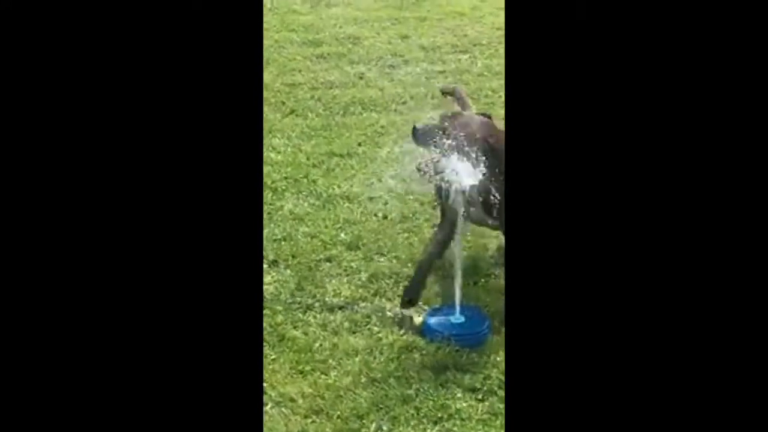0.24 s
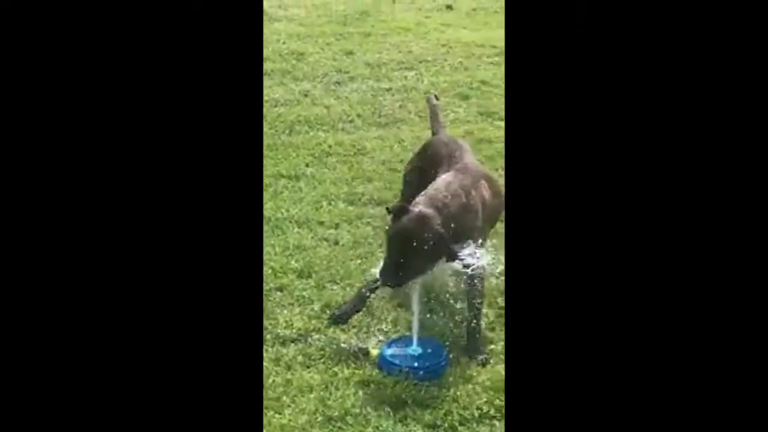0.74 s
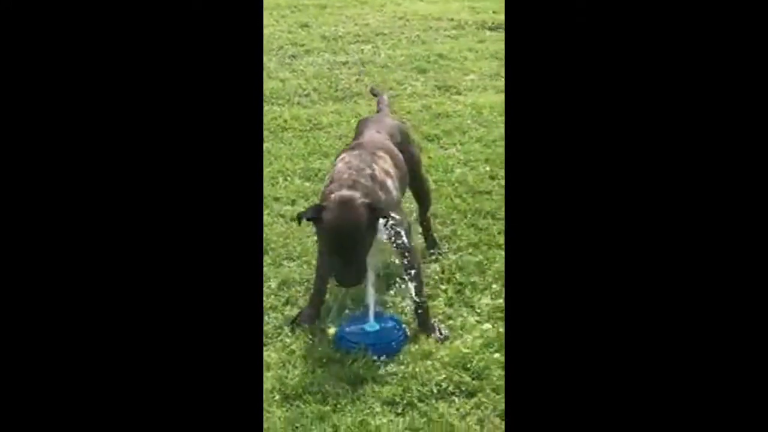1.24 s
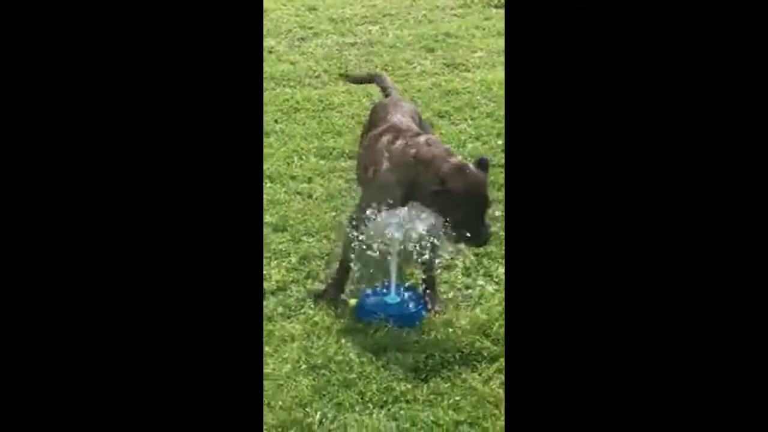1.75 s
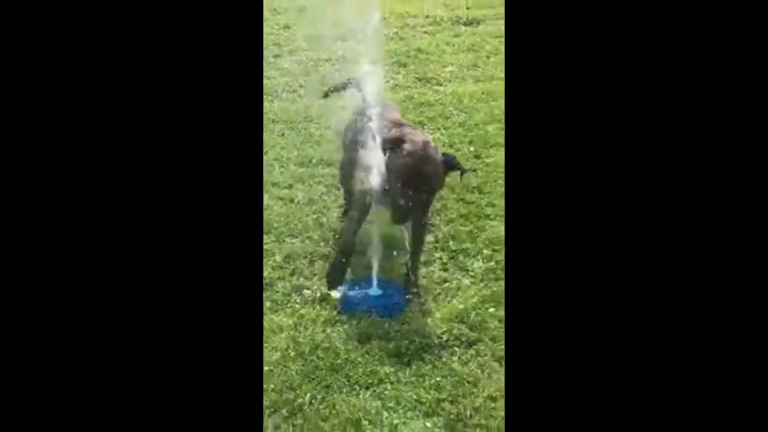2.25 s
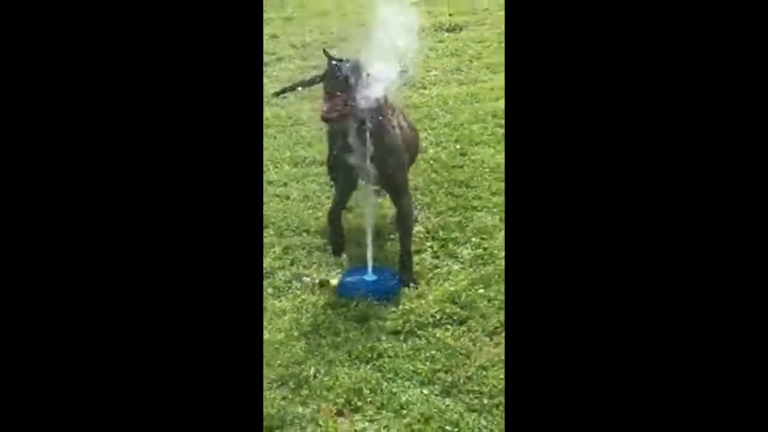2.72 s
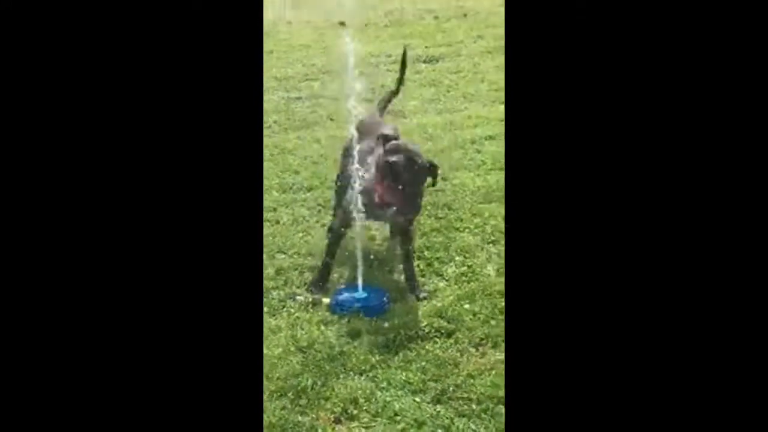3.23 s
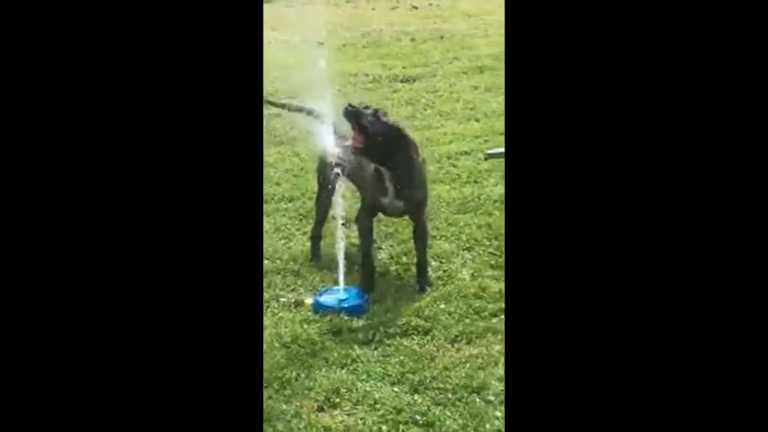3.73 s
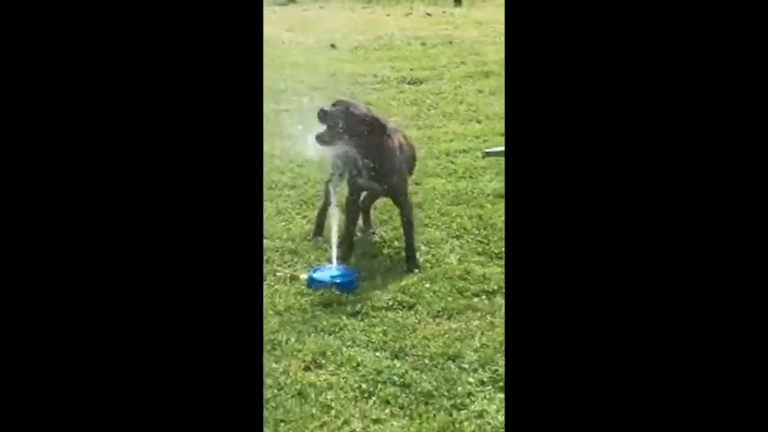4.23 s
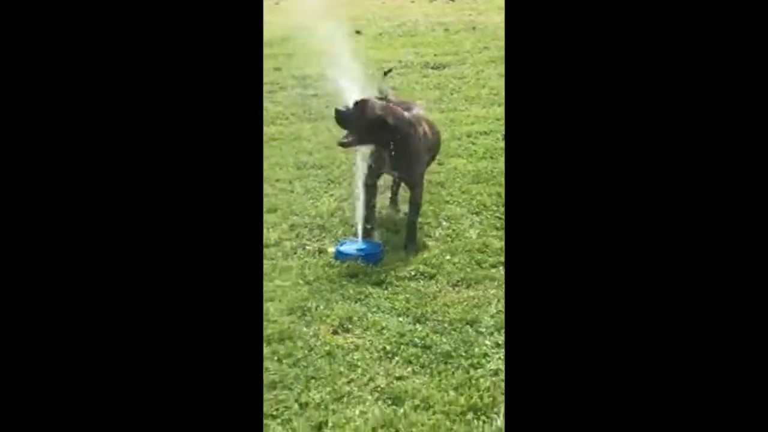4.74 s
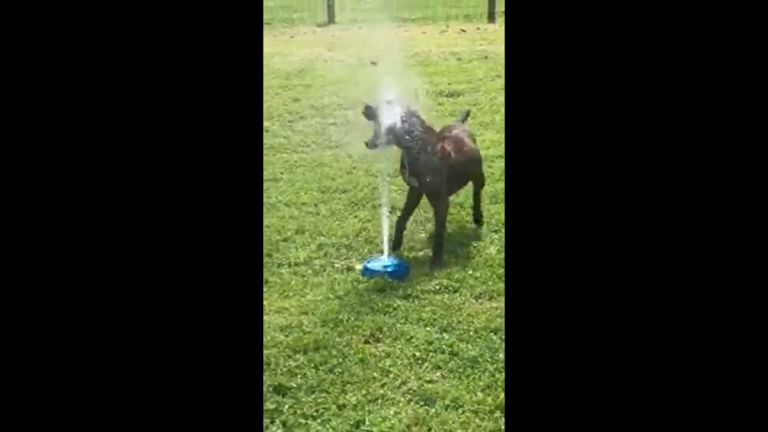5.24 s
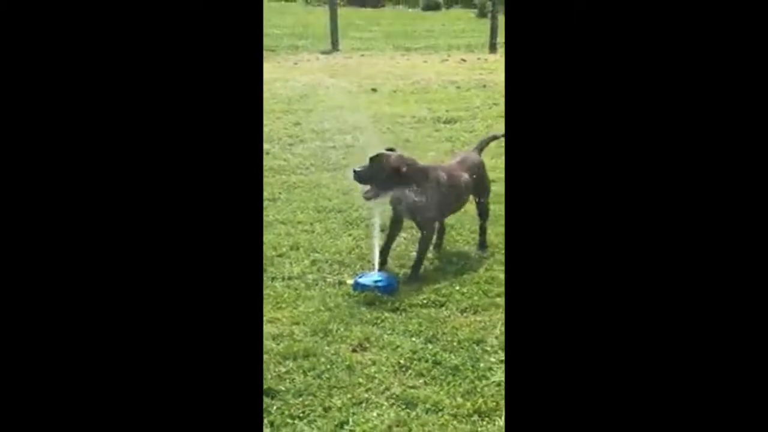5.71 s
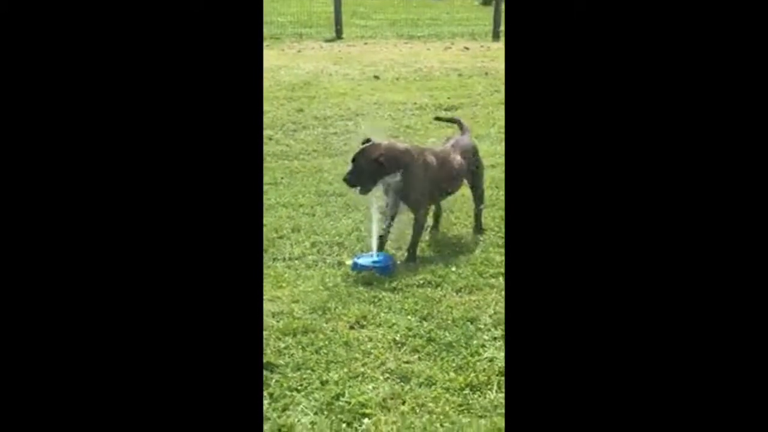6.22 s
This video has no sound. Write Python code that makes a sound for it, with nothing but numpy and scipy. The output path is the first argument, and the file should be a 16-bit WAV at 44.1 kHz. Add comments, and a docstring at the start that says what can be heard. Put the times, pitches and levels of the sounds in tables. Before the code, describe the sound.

A water jet hisses and splashes unevenly against a dog's coat and open mouth on a lawn, while wind thumps the microphone.

```python
"""A sprinkler toy shoots a jet of water up from a lawn while a dog snaps at it.
The jet is coloured drop noise: it hisses, splashes on the coat and rings through resonances in the open mouth.
A reflection off the wet ground sweeps a comb through the hiss as the point of impact rises and sinks.
Teeth click as short decaying tones; gusts of coloured noise and pressure drops buffet the microphone
over outdoor air and a low, slightly wavering hum."""
import sys
import numpy as np
from scipy import signal
from scipy.fft import rfft, irfft, next_fast_len
from scipy.io import wavfile
from scipy.ndimage import uniform_filter1d, map_coordinates

SR = 44100
rng = np.random.default_rng(int(sys.argv[2]) if len(sys.argv) > 2 else 0)


def to_wav(sig):
    """Store sig (one row per channel, or 1-D mono) as 16-bit WAV at the path in sys.argv[1].

    Samples outside -1..1 are clipped; the rate is SR.
    """
    pcm = np.clip(np.atleast_2d(sig), -1, 1) * 32767
    pcm = np.round(pcm).astype(np.int16)
    wavfile.write(sys.argv[1], SR, pcm.T)  # frames by channels


N = 285313  # length in samples

# Hiss of the jet, loud while the dog stands in it, faint while it rises freely.
# Each row: time in seconds, fine mist in dB, spray in dB, both before the layer trims.
JET_LEVELS = [(0, -46.5, -50), (.23, -49, -53.5), (.32, -45, -43), (.62, -40.5, -39.5), (.85, -41.5, -44),
              (1.25, -46, -52), (1.7, -48, -52), (2.06, -41, -42), (2.48, -43.5, -47.5), (2.7, -51, -54),
              (2.82, -47, -47), (3.08, -42, -43), (3.3, -45.5, -48), (3.44, -56.5, -56), (3.8, -54.5, -60),
              (3.91, -42, -45), (4.3, -41.5, -42), (4.7, -45, -48), (4.99, -50, -53), (5.08, -43.5, -42.5),
              (5.2, -44, -46), (5.55, -41.5, -45.5), (6.13, -45, -48.5), (6.47, -51, -54.5)]
# The full jet slaps onto the coat. Each row: start in seconds, hold in seconds, level in dB before the lumps.
COAT_SPLASHES = [(.06, 0.083, -47), (.38, .15, -45.5), (.64, 0.11, -42.5), (.87, 0.18, -49),
                 (1.07, 0.2, -45), (1.34, 0.26, -49.5), (1.85, .24, -42.5), (2.17, 0.1, -44.5),
                 (2.8, 0.16, -52), (3.13, 0.17, -44), (4.37, 0.052, -43.5), (4.52, 0.23, -45.5),
                 (5.09, 0.22, -51), (5.65, 0.053, -48.5), (6.22, 0.045, -48.5)]
SPLASH_ATTACK_S, SPLASH_RELEASE_S = 0.041, 0.056


def water():
    """Mist, spray and splash flutter together as lumps of the jet land; stray fat drops tick."""
    mist_db, spray_db = in_time(JET_LEVELS)
    spray_swing_db = spray_db - spray_db.mean()
    slaps = surges(COAT_SPLASHES, SPLASH_ATTACK_S, SPLASH_RELEASE_S)
    landing = slugs(per_s=160, fade_s=0.012)
    jet = mist(mist_db, landing) + spray(spray_db, slaps, landing)
    return jet + splash(spray_swing_db, slaps, landing) + stray_drops(spray_swing_db)


# Spectrum of the fine mist. Each row: frequency in Hz, relative density in dB per Hz.
MIST_SPECTRUM = [(4000, -26.5), (7000, -3.5), (7700, -1.5), (8350, 2.5), (8750, 1), (9400, 0.5),
                 (10200, -2.5), (11700, 1.5), (13500, -1), (16000, -5)]
MIST_TRIM_DB = 1.27


def mist(level_db, landing):
    """The densest, finest drops; they flutter with the landing lumps and partly on their own."""
    hiss = colour(drops(per_s=12000, spread_db=3.0, mist=1.0), MIST_SPECTRUM)
    hiss = off_ground(hiss, grass_hz=7500, tremble_ms=0.025)
    own_flutter = slugs(per_s=250, fade_s=0.015)
    return hiss * from_db(level_db + MIST_TRIM_DB + 0.59 * landing + 1.54 * own_flutter)


# Spectrum of the spray. Each row: frequency in Hz, relative density in dB per Hz.
SPRAY_SPECTRUM = [(700, -13), (2000, -13.5), (4000, -4.5), (4600, -1), (4950, -5), (5350, 0), (5650, -1),
                  (6800, 1.5), (7250, 1), (7700, -13), (9000, -22), (15000, -20)]
SPRAY_TRIM_DB = -1.16
SPLASH_SPRAY_DB = -11.5  # extra spray thrown by a splash, against the splash


def spray(level_db, slaps, landing):
    """Coarser drops sizzle, with more thrown off by each splash."""
    sizzle = colour(drops(per_s=7000, spread_db=3.5, mist=0.65), SPRAY_SPECTRUM)
    sizzle = off_ground(sizzle, grass_hz=8500, tremble_ms=0.025)
    level = np.hypot(from_db(level_db + SPRAY_TRIM_DB), from_db(SPLASH_SPRAY_DB) * slaps)
    return sizzle * level * from_db(1.1 * landing + 1.1 * drift(45))


# Spectrum of the splash. Each row: frequency in Hz, relative density in dB per Hz.
SPLASH_SPECTRUM = [(300, -16), (700, -6.5), (1200, -1.5), (1900, 3), (2600, 8), (3200, 8), (4200, 6.5),
                   (5000, 2.5), (6500, -4), (9000, -10), (15000, -21)]
# light patter that goes with the spray: level in dB at the mean spray level, share of the spray's swing
PATTER_DB, PATTER_FOLLOWS = -53, 0.32


def splash(spray_swing_db, slaps, landing):
    """Sparser, heavier impacts slap the coat over a light patter that follows the spray."""
    slap = colour(drops(per_s=2500, spread_db=3.0, mist=0.72), SPLASH_SPECTRUM)
    slap = off_ground(slap, grass_hz=6000, tremble_ms=0.035)
    patter = from_db(PATTER_DB + PATTER_FOLLOWS * spray_swing_db)
    return slap * np.hypot(patter, slaps) * from_db(0.06 + 1.96 * landing)


STRAY_DB, STRAY_FOLLOWS = -58, 0.69  # level at the mean spray level; share of the spray's swing


def stray_drops(spray_swing_db):
    """Single fat drops tick at random moments."""
    ticks = drops(per_s=30, spread_db=3.5, mist=0)
    ticks = colour(ticks, [(500, -6), (2000, 7.5), (4000, -7.0), (8000, 12), (16000, -13)])
    return ticks * from_db(STRAY_DB + STRAY_FOLLOWS * spray_swing_db)


# Ground reflection, later the higher the jet is caught and clearer the tighter its impact.
# Each row: time in seconds, lag in ms before the tremble, share from 0 to 1.
GROUND_REFLECTION = [(0, 1.2, .4), (.5, 1.42, .35), (.68, 1.33, .6), (.82, 1.08, .3), (1.2, .72, .4),
                     (1.8, .92, .45), (2.28, .95, .5), (2.5, 1.45, .15), (3.25, 1.28, .3), (4.0, 1.35, .4),
                     (4.6, 1.14, .75), (4.85, .92, .35), (5.3, 1.25, .3), (5.85, .83, .55),
                     (6.47, .71, .65)]


def off_ground(x, grass_hz, tremble_ms):
    """Direct sound plus a reflection dulled by grass; the trembling point of impact blurs the comb."""
    lag_ms, share = in_time(GROUND_REFLECTION)
    lag_ms = lag_ms + tremble_ms * drift(17)
    dull = signal.sosfiltfilt(signal.butter(1, grass_hz, fs=SR, output="sos"), x)
    reflection = map_coordinates(dull, [np.arange(N) - lag_ms * SR / 1000], order=3)
    return rms_one(x + share * reflection)


# The jet enters the open mouth. Each row: start in seconds, hold in seconds, level in dB, throat in Hz,
# throat glide in Hz per second, jaw cavity in Hz, jaw cavity in dB against the throat.
MOUTH_BITES = [(0.0, 0.057, -40.5, 1070, -200, 1780, -0.5), (0.45, 0.06, -44.5, 580, 295, 1220, 1),
               (0.876, 0.037, -42.5, 1100, -1200, 1730, -12), (1.075, .22, -50, 1150, -100, 1720, 2),
               (1.362, .17, -42.5, 1075, -300, 1800, -0.5), (1.63, 0.15, -45, 1050, 198, 1720, -3),
               (4.213, 0.063, -38.5, 676, 2000, 1380, 2)]
# Water slapping around lips and tongue. Each row: frequency in Hz, relative density in dB per Hz.
SLOSH_SPECTRUM = [(400, -13), (850, 6), (1400, 6), (2200, 9.5), (3000, 7), (3800, 0), (8000, -54)]
# The palate's fixed mode: frequency in Hz, width in Hz of each pass, level in dB against the jaw cavity.
PALATE_MODE = (2560, 410, -3)
THROAT_WIDTH_HZ, JAW_WIDTH_HZ = 230, 420  # of each of the two passes
BITE_ATTACK_S, BITE_RELEASE_S = 0.052, 0.072


def mouth():
    """Churning water rings a gliding throat, a jaw cavity and a palate, and slaps around the lips."""
    churn, out = drops(per_s=2500, spread_db=4.0, mist=0.99), np.zeros(N)
    slosh = colour(drops(per_s=1200, spread_db=1.0, mist=0.8), SLOSH_SPECTRUM)
    palate_hz, palate_width_hz, palate_db = PALATE_MODE
    for start, hold, db, throat_hz, glide, jaw_hz, jaw_db in MOUTH_BITES:
        flow = swell(start, hold, BITE_ATTACK_S, BITE_RELEASE_S)
        wet = flow > 0
        x, t = churn[wet], seconds()[wet] - start
        throat = cavity(x, throat_hz + glide * t, THROAT_WIDTH_HZ)
        jaw = cavity(x, np.full(len(x), jaw_hz), JAW_WIDTH_HZ)
        palate = cavity(x, np.full(len(x), palate_hz), palate_width_hz)
        front = jaw + from_db(palate_db) * palate + from_db(4.0) * slosh[wet]
        # the front of the mouth sounds in opposite phase to the throat
        hollow = throat - from_db(jaw_db) * front
        out[wet] += evened(hollow, span_s=0.13) * from_db(db) * flow[wet]
    return out


# The jaws snapping shut. Each row: time in seconds, level in dB of a 0 dB tooth.
JAW_SNAPS = [(3.6369, -32.5), (3.6404, -38), (3.6535, -41)]
# Ringing of the teeth. Each row: frequency in Hz, level in dB, time in seconds to fall by 60 dB.
TOOTH_MODES = [(1700, -28, .012), (2530, -8, 0.02), (3100, 0, 0.011), (3350, -1, 0.02), (4300, -2, .012),
               (5200, -5, .01), (5750, -3, 0.01), (7450, 0, 0.0043)]


def jaws():
    """Teeth meet with a dry tick and touch again: each contact starts a set of decaying tones."""
    clicks, t = np.zeros(N), seconds()[:SR // 10]
    for start, db in JAW_SNAPS:
        clicks[round(start * SR)] = from_db(db)
    ring = sum(from_db(db - 60 * t / t60) * np.sin(2 * np.pi * hz * t) for hz, db, t60 in TOOTH_MODES)
    return signal.fftconvolve(clicks, ring)[:N]


# The jet catches in a fold of lip or coat and the pocket rings briefly. Each row: centre in seconds,
# level in dB, half length in seconds, frequency in Hz, width in Hz of each pass.
RINGING_POCKETS = [(0.54, -45.5, 0.077, 1330, 260), (0.684, -42, 0.12, 3270, 600),
                   (1.234, -45, 0.059, 3030, 450), (1.371, -40.5, 0.082, 2440, 1100),
                   (2.025, -47.5, 0.22, 2480, 400), (2.03, -50, 0.12, 3230, 350),
                   (3.275, -43, 0.05, 3070, 500), (4.572, -51.5, 0.17, 1790, 380),
                   (4.622, -54.5, 0.22, 3500, 450), (6.257, -54, 0.16, 2800, 500)]


def pockets():
    """Drops drumming into a small hollow make a short, pitched swish."""
    rain, out = drops(per_s=1300, spread_db=3.5, mist=0.29), np.zeros(N)
    for centre, db, half_s, hz, width_hz in RINGING_POCKETS:
        a = max(int((centre - half_s) * SR), 0)
        b = min(int((centre + half_s) * SR), N)
        ring = cavity(rain[a:b], np.full(b - a, hz), width_hz)
        out[a:b] += from_db(db) * ring * np.hanning(b - a)
    return out


# The free jet falls back onto the grass: start in seconds, hold in seconds, level in dB.
GRASS_FALLBACK = (3.66, 0.46, -54.5)
# Spectrum of water on grass. Each row: frequency in Hz, relative density in dB per Hz.
GRASS_SPECTRUM = [(150, -11), (330, 4.5), (600, -5), (1200, -10.5), (3000, -16)]


def fallback():
    """Water that missed the dog comes down on the lawn in a soft, dull patter."""
    start, hold, db = GRASS_FALLBACK
    patter = colour(drops(per_s=400, spread_db=4.0, mist=0.63), GRASS_SPECTRUM)
    return from_db(db) * swell(start, hold, attack_s=0.12, release_s=0.13) * patter


# Breeze on the microphone between the gusts. Each row: time in seconds, level in dB before trim and lumps.
BREEZE_LEVELS = [(0, -42.5), (.6, -35), (.8, -48), (1.1, -32), (2.2, -39), (3.1, -33), (3.45, -51),
                 (4.1, -50), (4.6, -40), (4.9, -59.5), (5.3, -56), (5.7, -42.5), (6.47, -36)]
# Gusts. Each row: start in seconds, hold in seconds, then body, slow rumble and bright flutter,
# each in dB before its layer trim.
GUST_EVENTS = [(0.254, 0.088, -27.5, -27, -50), (.42, 0.092, -31, -31.5, -53),
               (.96, 0.055, -28.5, -40, -59), (1.059, 0.077, -22.5, -37, -47),
               (1.189, .075, -22.5, -27, -44), (1.336, 0.096, -24.5, -37, -41),
               (1.629, .045, -28.5, -33, -50), (1.704, .08, -24.5, -29, -43), (1.797, 0.032, -21, -21, -43),
               (1.875, 0.06, -28.5, -30, -53), (2.003, 0.077, -21, -34, -45),
               (2.328, 0.13, -37.5, -29.5, -59), (2.633, 0.054, -26, -27, -46),
               (2.747, .1, -24.5, -32, -50), (2.9, 0.043, -24, -24.5, -53), (3.027, .125, -30, -36, -54),
               (4.492, 0.1, -30, -34, -62.5), (4.703, 0.033, -31, -41, -68), (5.862, 0.041, -30, -24, -51),
               (5.927, 0.057, -31.5, -41, -53), (6.074, 0.067, -27, -26, -42.5),
               (6.21, .07, -29.5, -33, -41), (6.285, 0.23, -24.5, -28.5, -36.5)]
GUST_ATTACK_S, GUST_RELEASE_S = 0.021, 0.023


def wind():
    """Large eddies rumble under the breeze; each gust adds rumble, smaller eddies and a brighter flutter."""
    breeze_db, = in_time(BREEZE_LEVELS)
    starts, holds, *levels = np.transpose(GUST_EVENTS)
    pushes, heaves, tears = [
        surges(zip(starts, holds, db), GUST_ATTACK_S, GUST_RELEASE_S) for db in levels]
    return gust_body(breeze_db, pushes) + rumble(breeze_db, heaves) + flutter(tears)


# Spectrum of the smaller eddies. Each row: frequency in Hz, relative density in dB per Hz.
GUST_SPECTRUM = [(40, -12), (80, 5.5), (120, 8), (190, 1.5), (260, -10), (400, -24), (700, -49.5),
                 (1500, -44)]
BREEZE_TRIM_DB, GUST_TRIM_DB = -2.5, -2
BREEZE_LUMPS_DB = 2.5  # depth of the random lumps in the breeze


def gust_body(breeze_db, pushes):
    """Smaller eddies buffet the microphone, in a lumpy breeze and in the gusts."""
    eddies = evened(colour(rng.standard_normal(N), GUST_SPECTRUM), span_s=0.032)
    breeze = from_db(breeze_db + BREEZE_TRIM_DB + BREEZE_LUMPS_DB * drift(9.2))
    return eddies * np.hypot(breeze, from_db(GUST_TRIM_DB) * pushes)


# Spectrum of the slow rumble. Each row: frequency in Hz, relative density in dB per Hz.
RUMBLE_SPECTRUM = [(15, -20), (25, -31), (35, -3.5), (50, -4), (75, -0.5), (110, -6.5), (200, -45.5),
                   (500, -61)]
# rumble at the mean breeze level, its share of the breeze's swing, trim of the gusts' rumble
BREEZE_RUMBLE_DB, RUMBLE_FOLLOWS, GUST_RUMBLE_TRIM_DB = -39.5, 0.43, -2.5


def rumble(breeze_db, heaves):
    """Large eddies roll slowly with the breeze and heave with the gusts."""
    eddies = evened(colour(rng.standard_normal(N), RUMBLE_SPECTRUM), span_s=0.05)
    roll = from_db(BREEZE_RUMBLE_DB + RUMBLE_FOLLOWS * (breeze_db - breeze_db.mean()))
    return eddies * np.hypot(roll, from_db(GUST_RUMBLE_TRIM_DB) * heaves)


# Air tearing at the port. Each row: frequency in Hz, relative density in dB per Hz.
FLUTTER_SPECTRUM = [(100, -20.5), (230, 4), (350, -0.5), (500, -12.5), (700, -18), (1000, -37), (3000, -48)]
FLUTTER_TRIM_DB = 2.5


def flutter(tears):
    """Air tears at the microphone port in irregular bursts."""
    bursts = colour(drops(per_s=170, spread_db=5.5, mist=0.76), FLUTTER_SPECTRUM)
    return bursts * from_db(FLUTTER_TRIM_DB) * tears


# Single strong eddies thump on the microphone port. Each row: centre in seconds,
# depth in dB before the port's gain and high-pass, half width in ms.
PORT_EDDIES = [(1.807, -13.5, 1.5), (2.068, -14.5, 1.8), (2.762, -10.5, 2.4), (2.782, -19.5, 0.96),
               (2.816, -14, 1.55), (3.033, -23.5, 1.16), (3.147, -20.5, 0.57), (4.505, -25.5, 1.9),
               (4.828, -14, 5.3), (5.883, -18, 1.4), (6.135, -23.5, 1.1), (6.247, -23, 1.5),
               (6.305, -15.5, 0.97), (6.362, -18.5, 0.71)]
# Turbulence around each eddy. Each row: frequency in Hz, relative density in dB per Hz.
WAKE_SPECTRUM = [(100, -23.5), (220, 6), (350, -4), (500, -12), (700, -15.5), (1000, -28), (3000, -69)]
# fading time of the wake's power on either side; its level against an eddy of 1 ms half width
WAKE_S, WAKE_DB = 0.007, -21


def buffets():
    """A passing vortex makes a bell-shaped drop in pressure and a turbulent wake; tight ones drag the most."""
    t = seconds()
    suction, stirred_power = np.zeros(N), np.zeros(N)
    for centre, db, half_ms in PORT_EDDIES:
        suction += from_db(db) / (1 + ((t - centre) * 1000 / half_ms) ** 2)
        fade = np.exp(-np.minimum(np.abs(t - centre) / WAKE_S, 50))
        stirred_power += from_db(2 * db) / half_ms ** 2 * fade
    turbulence = evened(colour(rng.standard_normal(N), WAKE_SPECTRUM), span_s=0.018)
    wake = turbulence * np.sqrt(stirred_power)
    # the port passes only the fast part of each drop
    thump = signal.sosfilt(signal.butter(2, 80, "high", fs=SR, output="sos"), suction)
    return from_db(WAKE_DB) * wake - from_db(7.0) * thump


# Spectrum of the outdoor air. Each row: frequency in Hz, relative density in dB per Hz.
LAWN_SPECTRUM = [(30, 5), (100, -5.5), (200, -10.5), (400, -17.5), (800, -20.5), (1200, -15.5),
                 (3000, -26.5), (8000, -38), (16000, -49)]
LAWN_DB = -49.5
HUM_HZ, HUM_DB = 70.24, -42.5  # centres of the hum's wavering pitch and level


def background():
    """Outdoor air as steady coloured noise, and a low sine hum that wavers slightly."""
    hum_hz = HUM_HZ + 1.14 * drift(2.33)
    hum = np.sqrt(2) * np.sin(2 * np.pi * np.cumsum(hum_hz) / SR)
    air = colour(rng.standard_normal(N), LAWN_SPECTRUM)
    return from_db(HUM_DB + 0.5 * drift(3.9)) * hum + from_db(LAWN_DB) * air


def drops(per_s, spread_db, mist):
    """Impacts of many sizes at random moments, over a share of smooth mist."""
    sizes = from_db(spread_db * np.minimum(rng.exponential(1, N), 5)) * rng.choice([-1, 1], N)
    impacts = sizes * (rng.random(N) < per_s / SR)
    return rms_one(impacts) + mist * rng.standard_normal(N)


def slugs(per_s, fade_s):
    """Lumps of water land at random, each a sudden rise whose power dies away; spread 1."""
    lumps = rng.exponential(1, N) * (rng.random(N) < per_s / SR)
    power = signal.lfilter([1], [1, -np.exp(-1 / (fade_s * SR))], lumps + 1e-12)
    level = np.sqrt(power)
    return rms_one(level - level.mean())


def cavity(x, hz, width_hz):
    """A resonance passed twice, for dark valleys around it; rms 1."""
    return rms_one(resonance(resonance(x, hz, width_hz), hz, width_hz))


def resonance(x, hz, width_hz, size=256):
    """Two-pole resonance whose centre moves block by block."""
    r, out, state = np.exp(-np.pi * width_hz / SR), np.zeros(len(x)), np.zeros(2)
    zeros = np.array([1, 0, -1]) * (1 - r * r) / 2
    for i in range(0, len(x), size):
        poles = [1, -2 * r * np.cos(2 * np.pi * hz[i] / SR), r * r]
        out[i:i + size], state = signal.lfilter(zeros, poles, x[i:i + size], zi=state)
    return out


def colour(x, spectrum):
    """Causal (minimum-phase) filter with the given spectrum; rms 1."""
    size = 2 * next_fast_len(N // 2 + SR // 4)
    hz, db = np.transpose(spectrum)
    bins_hz = np.fft.rfftfreq(size, 1 / SR)
    gain = from_db(np.interp(np.log(bins_hz + 1), np.log(hz), db))
    # keeping only the first half of the cepstrum makes the filter causal
    cepstrum = irfft(np.log(gain))[:size // 2]
    response = np.exp(2 * rfft(cepstrum, size))
    return rms_one(irfft(rfft(x, size) * response)[:N])


def evened(x, span_s):
    """Noise with its slow swells taken out."""
    power = np.abs(uniform_filter1d(x * x, max(int(span_s * SR), 2)))
    return x / np.sqrt(power + 1e-12)


def drift(rate_hz):
    """Slow random wander of rms 1, drawn at every 40th sample and joined by lines."""
    r = np.exp(-80 * np.pi * rate_hz / SR)
    noise = rng.standard_normal(N // 40 + 2002)
    slow = signal.lfilter([1], [1, -2 * r, r * r], noise)[2000:]  # skip the filter's start
    return np.interp(np.arange(N) / 40, np.arange(len(slow)), rms_one(slow))


def swell(start, hold, attack_s, release_s):
    """A smooth rise up to the start, a hold, a smooth fall; height 1."""
    corners = [start - attack_s, start, start + hold, start + hold + release_s]
    ramp = np.interp(seconds(), corners, [0, 1, 1, 0])
    return ramp * ramp * (3 - 2 * ramp)


def surges(rows, attack_s, release_s):
    """Gain of a series of swells (start, hold, dB), added in power."""
    return np.sqrt(sum((from_db(db) * swell(s, hold, attack_s, release_s)) ** 2 for s, hold, db in rows))


def in_time(rows):
    """The columns of a curve table at every sample."""
    s, *columns = np.transpose(rows)
    return [np.interp(seconds(), s, c) for c in columns]


def seconds():
    """The time of every sample."""
    return np.arange(N) / SR


def from_db(db):
    """Decibels to amplitude."""
    return 10 ** (np.asarray(db) / 20)


def rms_one(x):
    """Scale to rms 1."""
    return x / np.sqrt(np.mean(x ** 2) + 1e-20)


def scene():
    """Water, dog, wind and background at one microphone."""
    wet = water() + fallback()
    dog = mouth() + pockets() + jaws()
    return (wet + dog + wind() + buffets() + background())[None]


CUTOFF_HZ = 15800


def record(dry):
    """The microphone sheds the deepest bass; the top is cut steeply."""
    thinned = signal.sosfilt(signal.butter(4, 36, "high", fs=SR, output="sos"), dry)
    return signal.sosfilt(signal.ellip(12, 0.1, 90, CUTOFF_HZ, fs=SR, output="sos"), thinned)


dry = scene()
out = record(dry)
to_wav(out)
```